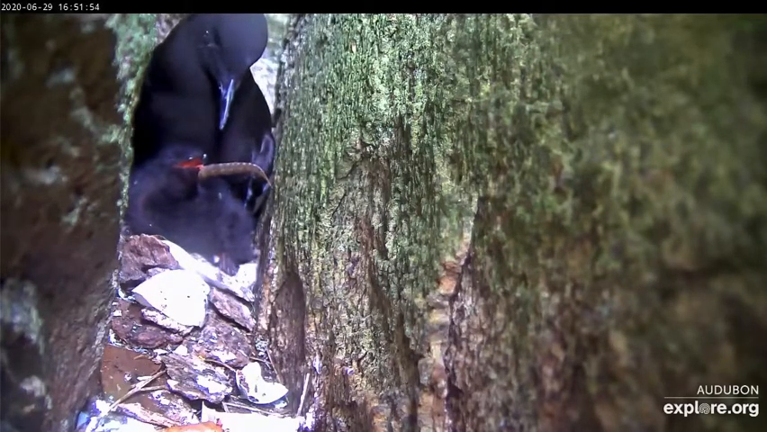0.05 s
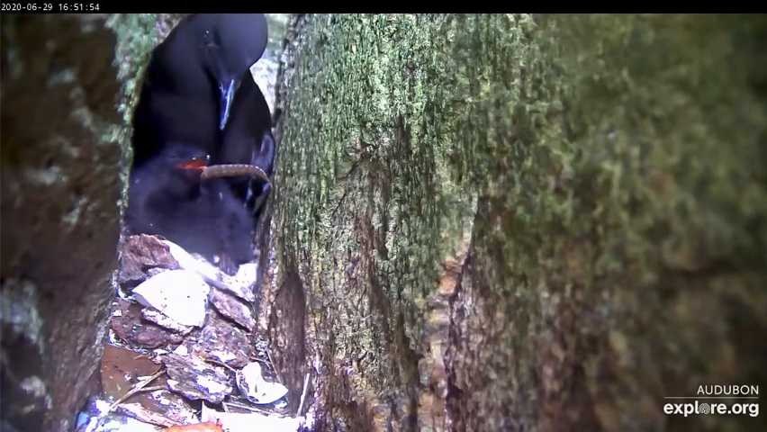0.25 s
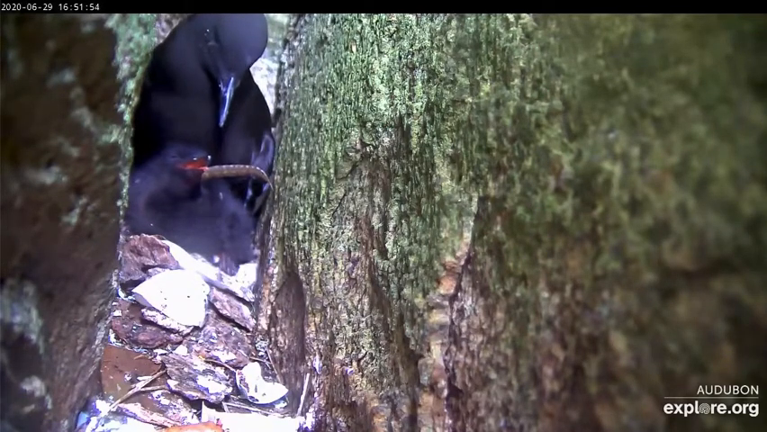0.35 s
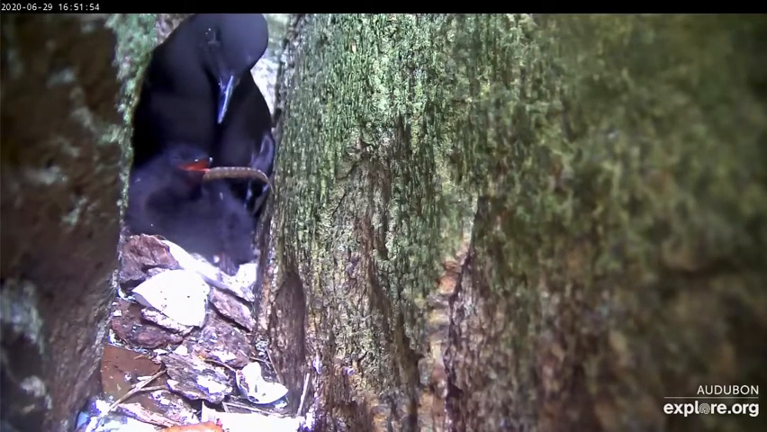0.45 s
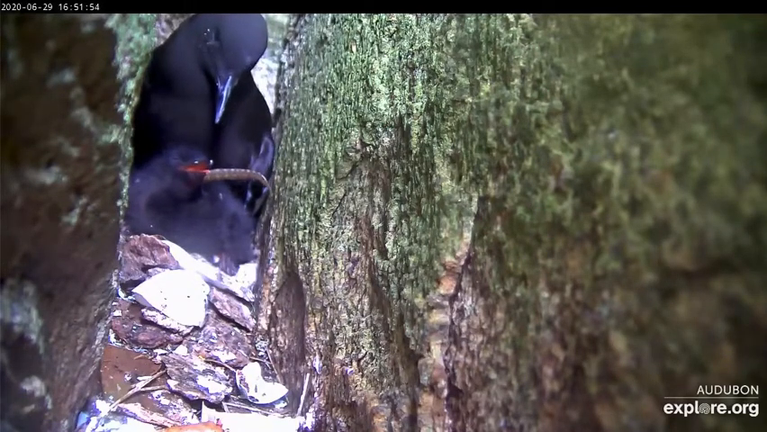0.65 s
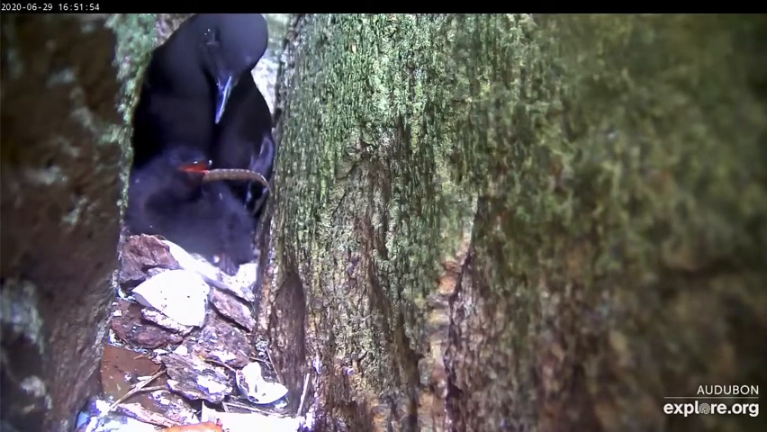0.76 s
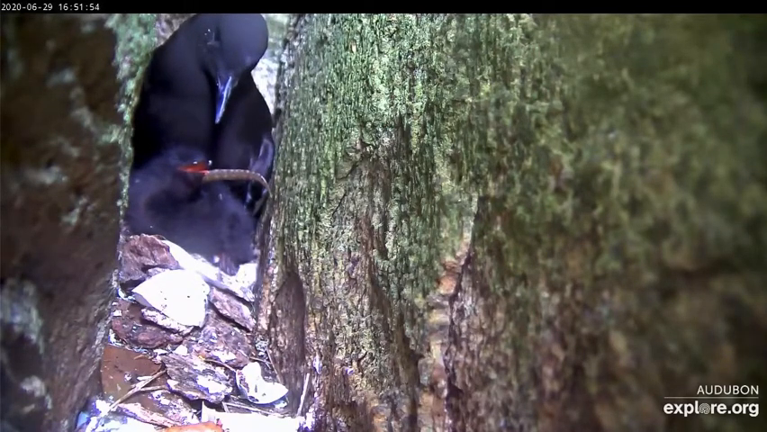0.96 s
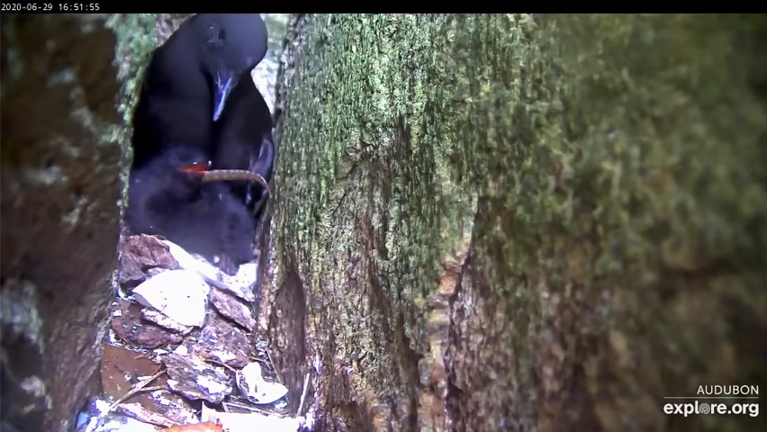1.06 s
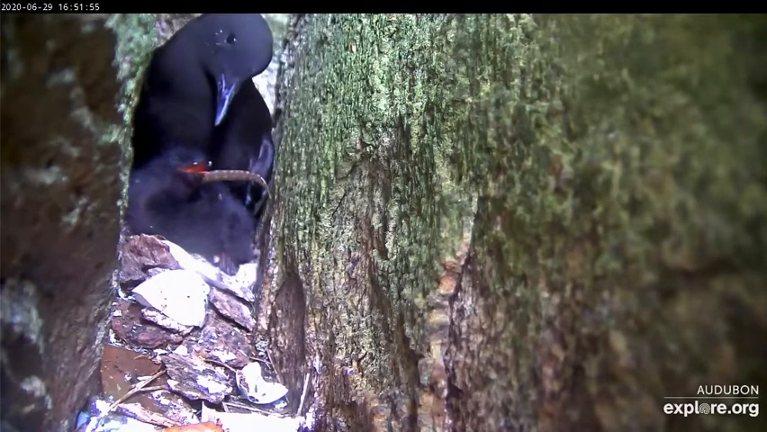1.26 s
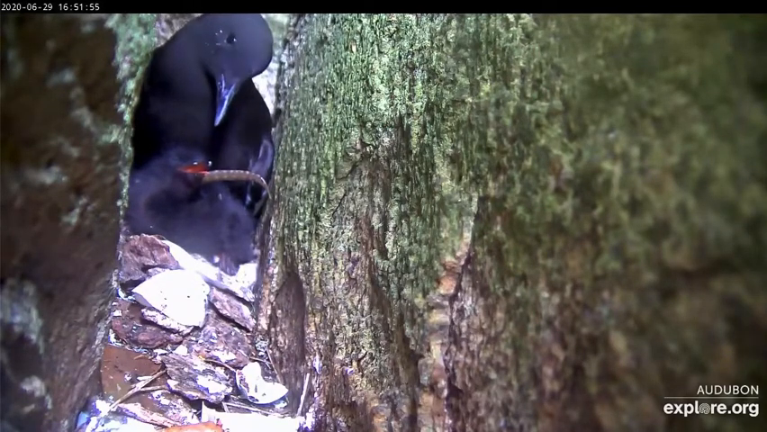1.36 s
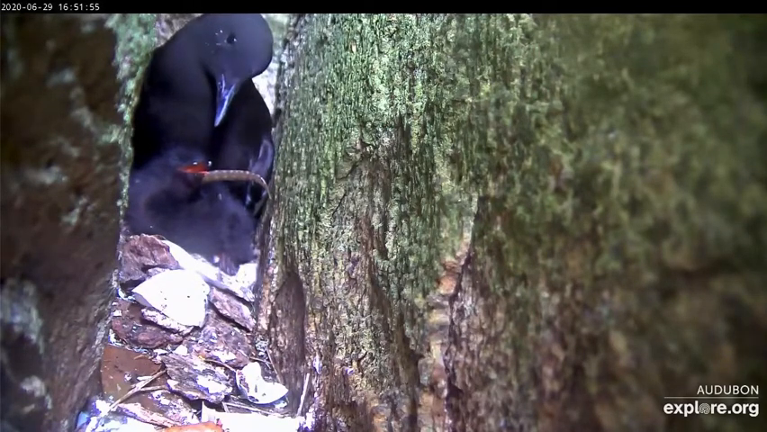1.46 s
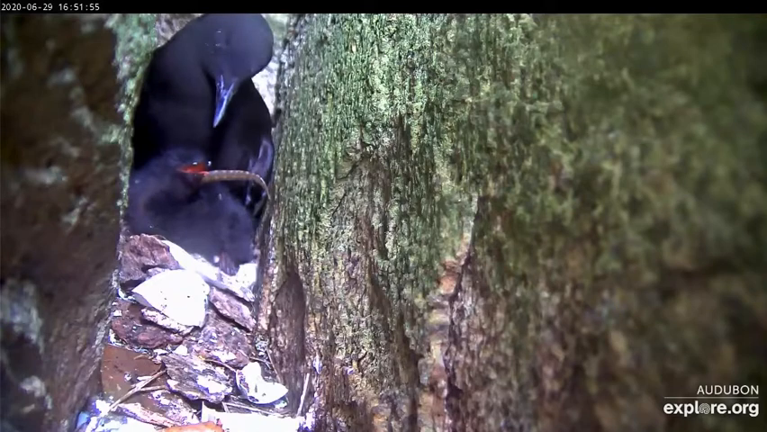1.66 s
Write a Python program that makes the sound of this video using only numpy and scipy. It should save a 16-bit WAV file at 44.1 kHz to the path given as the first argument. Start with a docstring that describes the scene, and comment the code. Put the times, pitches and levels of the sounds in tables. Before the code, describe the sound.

Hoarse, quavering seabird cries with a clear whistle and sharp chips in a rocky crevice.

```python
"""Hoarse seabird cries break into a fast quaver and fall away, close by in a rocky nest crevice.
A clear whistle arches over short, sharp chips and faint peeps. The cries and chips get their
grit from membranes beating unevenly. The rock walls ring briefly after each call, over a low
wash of surf and wind and the faint hum, whine and hiss of a small camera."""
import sys
import numpy as np
from scipy import signal
from scipy.fft import rfft, irfft
from scipy.io import wavfile
from scipy.ndimage import uniform_filter1d

SR = 44100
rng = np.random.default_rng(int(sys.argv[2]) if len(sys.argv) > 2 else 0)


def log_audio(samples):
    """Write samples as a 16-bit WAV file to the path given in sys.argv[1]."""
    # one column per channel
    frames = np.atleast_2d(samples).T
    # limit to full scale, then quantise
    limited = np.clip(frames, -1, 1)
    pcm = np.round(limited * 32767).astype(np.int16)
    wavfile.write(sys.argv[1], SR, pcm)


N = 74970

# One gesture per cry; the last is a lower voice that breaks in under the long cry.
# Each row: time in seconds, pitch in Hz, fundamental and second harmonic in dB before the throat EQ,
# quaver dip as a share of pitch, roughness from 0 to 1.
CRY_CURVES = [
    [(.204, 1182, -37.5, -55.5, 0, 0.08), (.211, 1248, -34.5, -57.5, 0.024, 0.01),
     (.216, 1442, -26.5, -34, 0.007, 0.04), (.231, 1413, -38, -35.5, 0.00097, 0.14),
     (.243, 1347, -45.5, -33, 0.021, 0.41), (.251, 1072, -38, -33, 0.0067, 0.23),
     (.272, 1191, -43, -41, 0.01, 0.11), (.300, 1295, -37, -37.5, 0.0085, 0.04),
     (.316, 1325, -37, -23.5, 0.0025, 0.01), (.336, 1356, -35.5, -28.5, 0.047, 0.14),
     (.347, 1403, -31, -30, 0.19, 0.08), (.392, 1392, -32.5, -29, 0.14, .2),
     (.403, 1136, -31.5, -29, 0, 0.16), (.432, 1098, -39.5, -32, 0.15, 0.74),
     (.452, 1028, -41, -34.5, 0.13, 0.77), (.478, 922, -52.5, -46.5, 0.1, 0.4)],
    [(.574, 1148, -38, -43.5, 0.0048, .4), (.586, 1289, -33, -35, 0.069, 0),
     (.599, 1514, -30, -22, 0.013, 0.31), (.607, 1414, -35, -23.5, 0.0091, .3),
     (.614, 958, -38.5, -42.5, 0, 0.54), (.624, 784, -42.5, -45, 0.0139, .5)],
    [(1.134, 1332, -44.5, -37.5, 0.017, 0.29), (1.144, 1319, -42.5, -34.5, 0.0032, 0.39),
     (1.150, 1486, -31.5, -26, 0.018, 0.09), (1.165, 1499, -29, -37.5, 0.0059, 0),
     (1.182, 1496, -27.5, -34, 0.02, 0.02), (1.208, 1481, -28.5, -26.5, 0, 0.06),
     (1.226, 1473, -33, -31, 0.08, 0), (1.252, 1479, -30, -27, .13, 0.2),
     (1.292, 1476, -32.5, -28.5, 0.17, 0.39), (1.315, 1428, -29, -28.5, 0.067, 0),
     (1.335, 1406, -35.5, -31.5, .11, 0.42), (1.38, 1389, -53, -34, 0.004, 0.54)],
    [(1.329, 1195, -42, -42.5, 0, 0.08), (1.340, 1135, -30.5, -27.5, 0.017, 0.13),
     (1.362, 1028, -30.5, -32, 0.039, 0.18), (1.385, 951.4, -36, -29, .1, 0.59),
     (1.412, 880, -48, -46, .12, 0.8)],
]
# For each cry, the time in seconds of one catch in the voice; its other catches keep time with it.
CATCH_TIMES = [0.344, 0.585, 1.25, 1.378]
# The throat's colour on a cry. Each row: frequency in Hz, gain in dB.
THROAT_EQ = [(450, -32), (900, -4), (1500, -0.5), (1720, -13), (2150, 0), (2450, -2), (2950, -1.5),
             (3250, -19), (3650, -24), (4100, -10), (4550, -13.5), (5200, -2.5), (5550, -0.5), (6400, -12)]
# The whistle's arch. Each row: time in seconds, pitch in Hz, fundamental in dB, octave in dB.
WHISTLE_CURVE = [(.791, 2717, -36, -61.5), (.798, 2625, -34.5, -41), (.811, 2748, -26, -49.5),
                 (.824, 2795, -20.5, -39), (.842, 2866, -22.5, -44.5), (.866, 2930, -22.5, -59.5),
                 (.915, 2944, -26.5, -63), (.945, 2873, -24.5, -49), (.962, 2761, -28, -53.5),
                 (.985, 2656, -39.5, -81.5)]
# Chips that hold, then drop. Each row: start, hold and drop in seconds, top pitch in Hz,
# level of the hold and level the drop heads for, both in dB before the beak EQ.
CHIP_CUES = [(0.546, .028, 0.024, 1704, -39.5, -44), (0.87, 0.033, 0.023, 1684, -38, -39.5),
             (1.587, .026, .026, 1706, -34.5, -34.5)]
# The beak's colour on a chip. Each row: frequency in Hz, gain in dB.
BEAK_EQ = [(450, -36.5), (650, -20), (900, -7.5), (1400, -9.5), (1700, -17), (2400, -4), (3350, -8.5),
           (4100, -35), (4650, -1), (5050, -2), (5700, -3), (6800, -28)]
# Thin high notes: faint peeps, a bright overtone of the first cry, and the hoarse burst that opens
# the first chip. Each row: start and length in seconds, pitch in Hz, mid-note level in dB.
THIN_NOTE_CUES = [(0.138, 0.032, 5590, -61.5), (0.381, 0.032, 4820, -55), (.508, 0.037, 3340, -46.5),
                  (0.291, 0.024, 5180, -54.5), (0.543, .011, 5440, -47), (0.548, 0.0049, 3670, -41),
                  (0.572, .036, 5850, -50), (1.057, .025, 2134, -53), (1.145, 0.072, 2109, -55.5),
                  (1.414, .02, 2167, -46), (1.47, 0.012, 2104, -48.5)]
# The colour of the crevice's ring. Each row: frequency in Hz, gain in dB.
RING_EQ = [(600, -9), (950, -4), (1400, -4.5), (2150, -11), (2600, 4), (3500, -10), (5000, 7.5),
           (6500, 6.5)]
# How long that ring hangs on. Each row: frequency in Hz, seconds to fall 60 dB.
RING_DECAY = [(600, 0.044), (1400, 0.38), (2900, .38), (4000, 0.2), (6500, 0.093)]
# The crevice's air modes. Each row: frequency in Hz, seconds to fall 60 dB, gain at resonance in dB.
AIR_MODES = [(1467, 0.13, -1), (2118, 0.17, 1), (2830, 0.18, -13)]
# The colour of surf and wind. Each row: frequency in Hz, relative level in dB.
WASH_EQ = [(35, -53.5), (62, -14.5), (200, -9), (470, -15.5), (620, -3), (950, 2), (1430, 4), (1700, -8),
           (2200, -1), (2500, -1), (2950, 6), (3500, -12.5), (4200, -15), (5000, -11), (5900, -10.5),
           (6600, -15), (9000, -27)]

JITTER_HZ, FLUTTER_HZ, FLUTTER_DEPTH = 420, 150, 0.3
QUAVER_HZ, QUAVER_PITCH_HZ, QUAVER_SLOWING = 79, 1440, 1.1  # rate, at this pitch; slower below it
CATCH_SHARPNESS, CATCH_DB, BREAK_DB = 1.9, -28, -13  # dB per unit of quaver, and of roughness
CRY_RASP_DB, CHIP_RASP_DB = -22, -4.5
UPPER_DB, CRY_ROLLOFF_DB = -0.5, 13.5  # trim from the third harmonic up; loss per harmonic
CHIP_ROLLOFF_DB, CHIP_DULL_DB = 12, 11  # loss per harmonic: above the third; added by the drop
CHIP_ATTACK_S, CHIP_RELEASE_S = 0.015, 0.0037
CHIP_ARCH, CHIP_END_RATIO = 0.012, 0.47  # shares of the top pitch
CHIP_ROUGH, DROP_ROUGH = 0.09, 0.6
WHISTLE_JITTER, NOTE_JITTER, NOTE_SAG = 0.0025, 0.011, 0.012  # shares of pitch
WALLS_DB, WALLS_T60_S, RING_DB, NEAR_WALL_SEND = -5.5, 0.084, -17.5, 0.5
WASH_DB, WASH_PATCH_DB, WASH_SWELL_DB = -56, 2, 0.6
FADE_IN_DB, FADE_IN_S = -15.5, 0.45
HUM_HZ, HUM_DB, HUM_WAVER = 102, -84, 0.32
WHINE_HZ, WHINE_DB, HISS_DB = 15735, -82, -79.5
MIC_EDGE_HZ, BAND_LIMIT_HZ = 6300, 15950


def cry(curve, catch_s):
    """A hoarse voice catches in quick dips; as the pitch sinks they slow and break it into pulses."""
    t, hz, first_db, second_db, quaver, rough = follow(curve)
    drift = 1 + 0.04 * wander(len(t), QUAVER_HZ / 2)
    beats = np.cumsum(QUAVER_HZ * (hz / QUAVER_PITCH_HZ) ** QUAVER_SLOWING * drift) / SR
    beats -= np.interp(catch_s, t, beats)
    catch = (np.cos(np.pi * beats) ** 2) ** CATCH_SHARPNESS
    phase, strength = syrinx(hz * (1 - quaver * catch), rough)
    rasp = noise(len(t), lambda f: (f > hz.min()) / (1 + (f / hz.max() / 2) ** 4))
    first = amp(first_db) * np.sin(phase)
    second = amp(second_db) * (np.sin(2 * phase) + amp(CRY_RASP_DB) * rough * rasp)
    upper = sum(amp(-CRY_ROLLOFF_DB * (k - 2)) * np.sin(k * phase) for k in range(3, 6))
    upper *= amp(UPPER_DB + (first_db + second_db) / 2)
    dip = amp((CATCH_DB * quaver + BREAK_DB * rough) * catch)
    voice = strength * dip * (first + second + dip * upper)  # the top ducks twice: each catch dulls
    return t[0], colour(voice, lambda f: amp(read(THROAT_EQ, f)))


def syrinx(hz, rough):
    """Phase and strength of membranes that beat more unevenly with roughness."""
    pitch = hz * (1 + 0.11 * rough * wander(len(hz), JITTER_HZ))
    shimmer = 1 + rough * wander(len(hz), JITTER_HZ)
    return 2 * np.pi * np.cumsum(pitch) / SR, np.sqrt(2) * shimmer


def whistle():
    """A nearly pure arch of tone with a weak octave on top."""
    t, hz, db, octave_db = follow(WHISTLE_CURVE)
    pitch = hz * (1 + WHISTLE_JITTER * wander(len(t), JITTER_HZ))
    phase = 2 * np.pi * np.cumsum(pitch) / SR
    return t[0], np.sqrt(2) * (amp(db) * np.sin(phase) + amp(octave_db) * np.sin(2 * phase))


def chip(start, hold, drop, top_hz, db, drop_db):
    """A bright, fluttering note that cracks: its overtones give way to a low, rasping chuck."""
    t = np.arange(0, hold + drop, 1 / SR)
    fall = np.clip((t - hold) / drop, 0, 1)
    arch = 1 - CHIP_ARCH * (1 - np.sin(np.pi * np.minimum(t / hold, 1)))
    pitch = top_hz * arch * CHIP_END_RATIO ** (np.sin(np.pi * fall / 2) ** 2)
    phase, strength = syrinx(pitch, CHIP_ROUGH + (DROP_ROUGH - CHIP_ROUGH) * np.sqrt(fall))
    tone = sum(amp(-CHIP_ROLLOFF_DB * max(k - 3, 0) - CHIP_DULL_DB * (k - 1) * fall) * np.sin(k * phase)
               for k in range(1, 6))
    rasp = amp(CHIP_RASP_DB) * np.sqrt(fall) * noise(len(t), lambda f: 1 / (1 + (f / top_hz / 2) ** 4))
    attack = np.minimum(t / CHIP_ATTACK_S, 1)
    release = np.sqrt(np.minimum((t[-1] - t) / CHIP_RELEASE_S, 1))
    flutter = 1 + FLUTTER_DEPTH / 2 * wander(len(t), FLUTTER_HZ)
    voice = attack * release * flutter * amp(db + (drop_db - db) * fall) * strength * (tone + rasp)
    return start, colour(voice, lambda f: amp(read(BEAK_EQ, f)))


def thin_note(start, length, hz, db):
    """A single high, hoarse partial that sags slightly."""
    progress = np.arange(0, 1, 1 / (length * SR))
    pitch = hz * (1 + NOTE_SAG * (0.5 - progress) + NOTE_JITTER * wander(len(progress), JITTER_HZ))
    envelope = np.sin(np.pi * progress) * (1 + FLUTTER_DEPTH * wander(len(progress), JITTER_HZ))
    return start, np.sqrt(2) * amp(db) * envelope * np.sin(2 * np.pi * np.cumsum(pitch) / SR)


def crevice(birds, near):
    """Quick reflections off the walls (weaker for the near bird), air modes and a faint ring."""
    t = np.arange(N) / SR
    walls = rng.standard_normal(N) * amp(-60 * t / WALLS_T60_S) * (t > 0.002)  # 2 ms pre-delay
    walls = amp(WALLS_DB) * unit_rms(walls) / np.sqrt(N)
    hz, seconds, spectrum = signal.stft(rng.standard_normal(N), SR, nperseg=256)
    decay = amp(-60 * seconds / read(RING_DECAY, hz)[:, None])
    tail = signal.istft(spectrum * decay, SR, nperseg=256)[1][:N]
    tail = colour(unit_rms(tail) / np.sqrt(N), lambda f: amp(read(RING_EQ, f)))
    modes = sum(amp(db - 60 * t / t60) * np.cos(2 * np.pi * f * t) * 2 * np.log(1000) / t60 / SR
                for f, t60, db in AIR_MODES)
    early = signal.fftconvolve(birds + NEAR_WALL_SEND * near, walls)[:N]
    ring = signal.fftconvolve(birds + near, amp(RING_DB) * tail + modes)[:N]
    return birds + near + early + ring


def surf_and_wind():
    """The wash from outside: noise with drifting patches of colour and a slight swell."""
    hz, _, spectrum = signal.stft(rng.standard_normal(N), SR, nperseg=2048)
    patches = uniform_filter1d(rng.standard_normal(spectrum.shape), size=12, axis=0)  # blur in frequency
    patches = unit_rms(uniform_filter1d(patches, size=4, axis=1))  # and in time
    gain = amp(read(WASH_EQ, hz)[:, None] + WASH_PATCH_DB * patches)
    wash = signal.istft(spectrum * gain, SR, nperseg=2048)[1][:N]
    return amp(WASH_DB + WASH_SWELL_DB * wander(N, hz=9.2)) * unit_rms(wash)


def camera_noise():
    """The camera's steady high whine, with a wavering hum and hiss that fade in."""
    t = np.arange(N) / SR
    waver = 1 + HUM_WAVER * wander(N, hz=22)
    hum = np.sqrt(2) * amp(HUM_DB) * waver * np.sin(2 * np.pi * HUM_HZ * t)
    whine = np.sqrt(2) * amp(WHINE_DB) * np.sin(2 * np.pi * WHINE_HZ * t)
    hiss = amp(HISS_DB) * rng.standard_normal(N)
    return whine + fade_in() * (hum + hiss)


def fade_in(depth=1):
    """The background's fader: it comes up from depth times FADE_IN_DB."""
    t = np.arange(N) / SR
    return amp(depth * FADE_IN_DB * np.maximum(1 - (t / FADE_IN_S) ** 2, 0))


def amp(db):
    """Decibels to gain."""
    return 10 ** (np.asarray(db) / 20)


def unit_rms(x):
    """Scales to rms 1."""
    return x / np.sqrt(np.mean(x ** 2) + 1e-20)


def read(points, hz):
    """Reads a curve on a log-frequency axis."""
    f, value = np.transpose(points)
    return np.interp(np.log(np.abs(hz) + 1), np.log(f + 1), value)


def follow(curve):
    """Turns breakpoints into sample times and smooth control lanes."""
    times, *lanes = np.transpose(curve)
    t = np.arange(times[0], times[-1], 1 / SR)
    return [t] + [uniform_filter1d(np.interp(t, times, lane), size=130) for lane in lanes]


def colour(x, gain):
    """Equalises x by a gain given as a function of frequency."""
    size = 2 * len(x)
    return irfft(rfft(x, size) * gain(np.fft.rfftfreq(size, 1 / SR)), size)[:len(x)]


def noise(count, gain):
    """Coloured noise of rms about 1."""
    return unit_rms(colour(rng.standard_normal(N), gain))[:count]


def wander(count, hz):
    """Random drift that rolls off above hz."""
    return noise(count, lambda f: np.exp(-(f / hz) ** 2))


def add(mix, start_s, sound):
    """Mixes a sound in with softened ends."""
    softened = sound * signal.windows.tukey(len(sound), min(1, 160 / len(sound)))
    part = mix[max(round(start_s * SR), 0):][:len(sound)]
    part += softened[:len(part)]


def scene():
    """All the birds in the crevice, the whistler nearest, over the wash."""
    birds, near = np.zeros((2, N))
    for curve, catch_s in zip(CRY_CURVES, CATCH_TIMES):
        add(birds, *cry(curve, catch_s))
    for cue in CHIP_CUES:
        add(birds, *chip(*cue))
    for cue in THIN_NOTE_CUES:
        add(birds, *thin_note(*cue))
    add(near, *whistle())
    return (crevice(birds, near) + fade_in(depth=0.36) * surf_and_wind())[None]


def record(dry):
    """A narrow-band microphone cuts the top; the camera's noise joins before the band limit."""
    mic = colour(dry[0], lambda f: 1 / np.sqrt(1 + (f / MIC_EDGE_HZ) ** 44))
    band_limit = signal.firwin(1023, BAND_LIMIT_HZ, window=("kaiser", 9), fs=SR)
    return signal.oaconvolve(mic + camera_noise(), band_limit, "same")[None]


dry = scene()
out = record(dry)
log_audio(out)
```